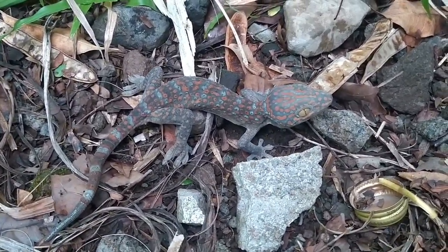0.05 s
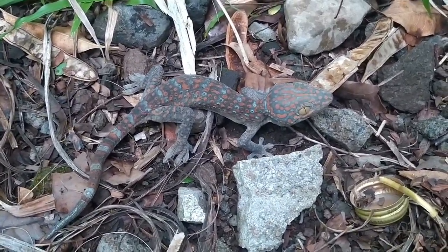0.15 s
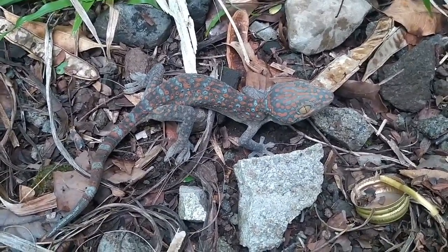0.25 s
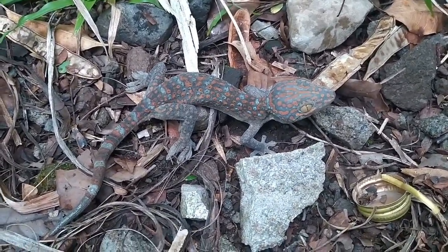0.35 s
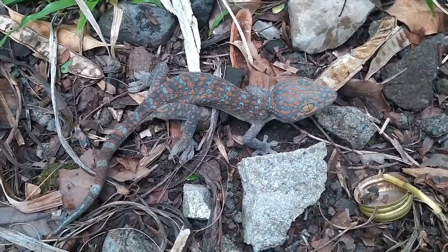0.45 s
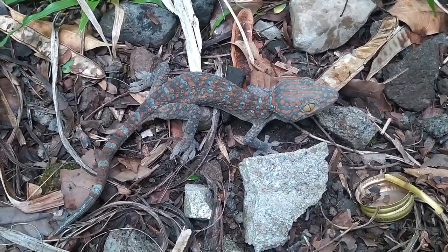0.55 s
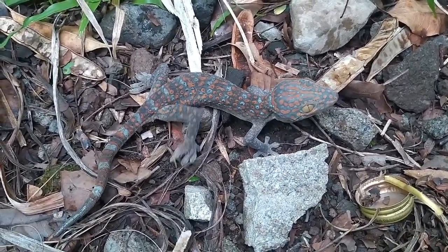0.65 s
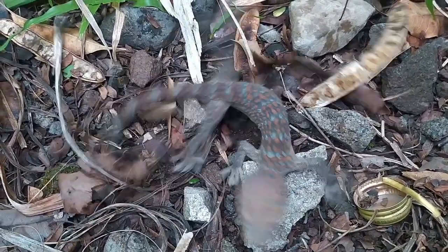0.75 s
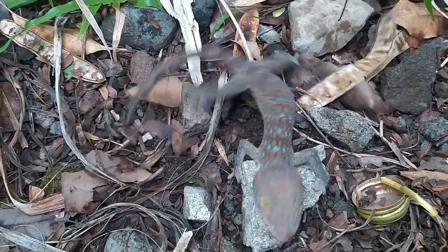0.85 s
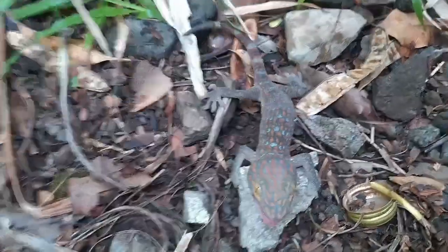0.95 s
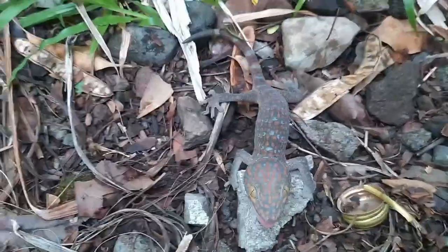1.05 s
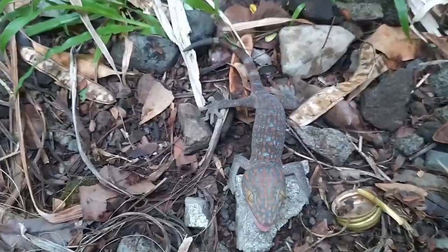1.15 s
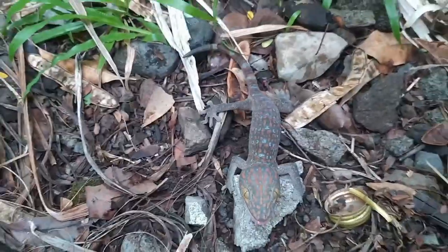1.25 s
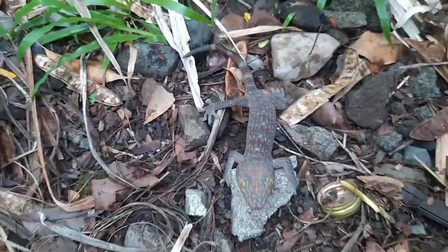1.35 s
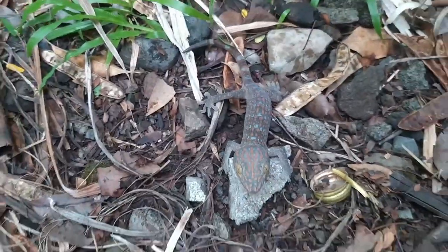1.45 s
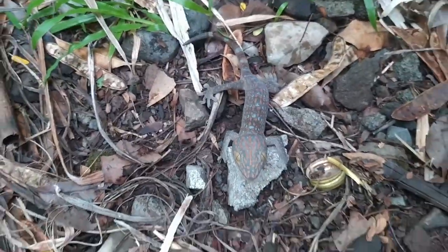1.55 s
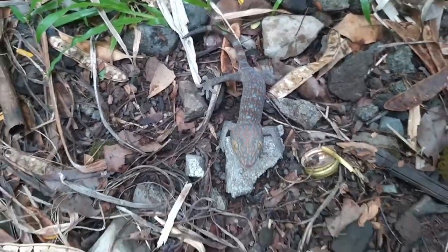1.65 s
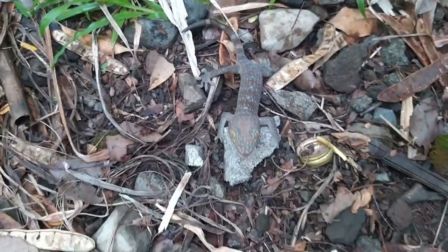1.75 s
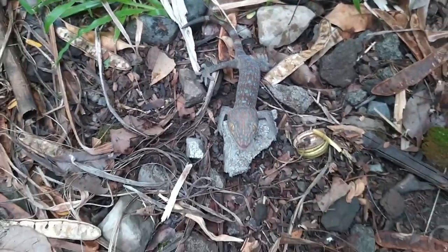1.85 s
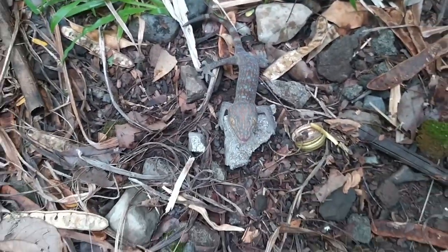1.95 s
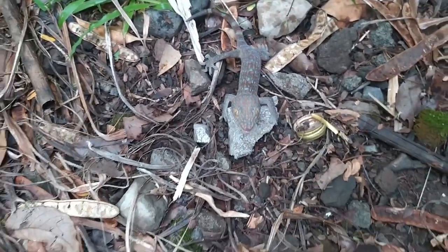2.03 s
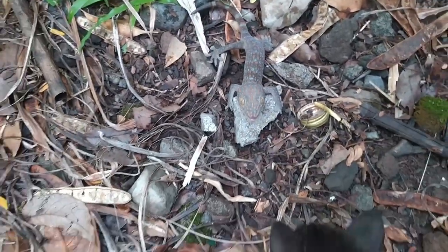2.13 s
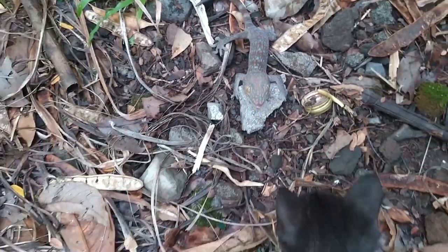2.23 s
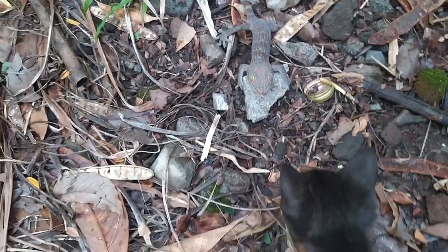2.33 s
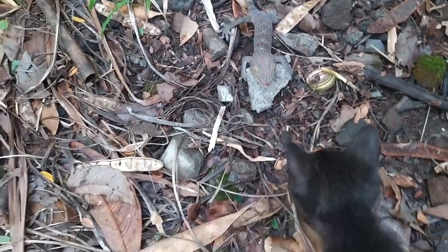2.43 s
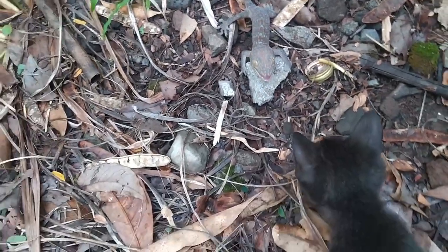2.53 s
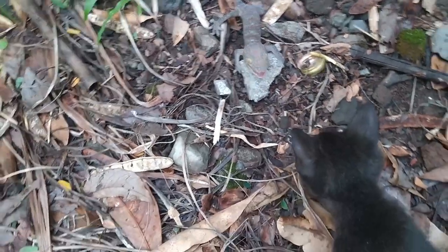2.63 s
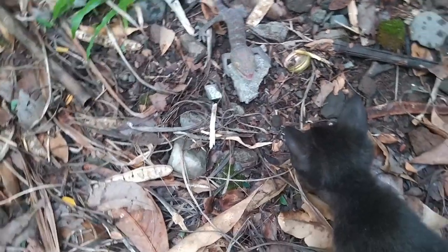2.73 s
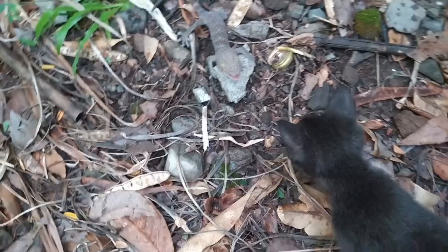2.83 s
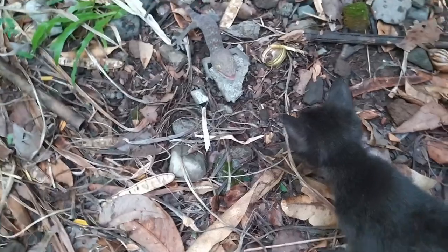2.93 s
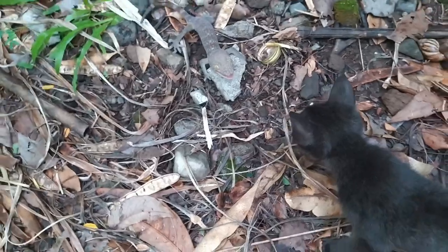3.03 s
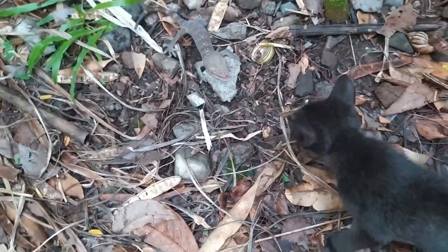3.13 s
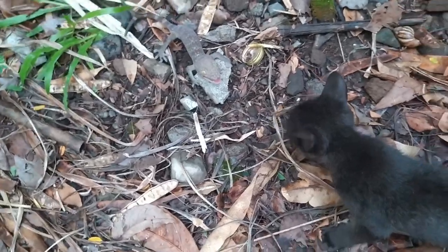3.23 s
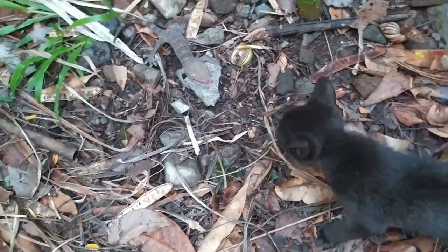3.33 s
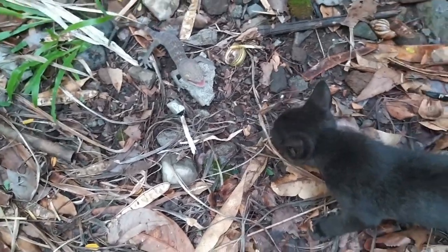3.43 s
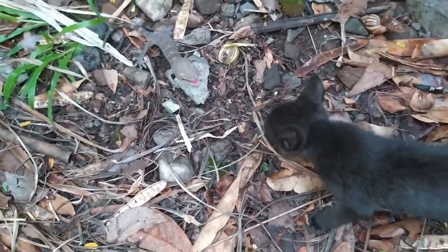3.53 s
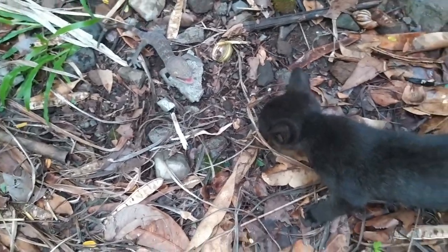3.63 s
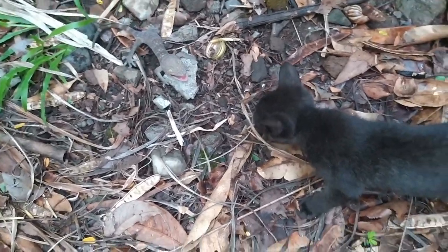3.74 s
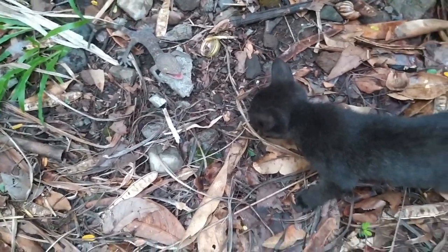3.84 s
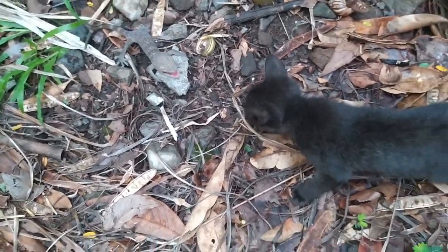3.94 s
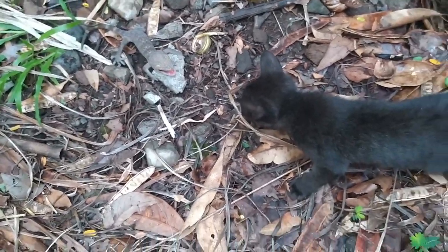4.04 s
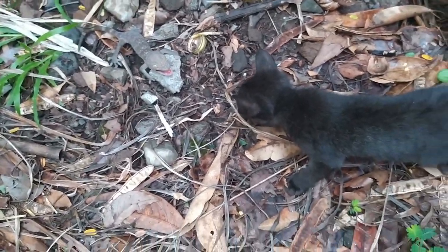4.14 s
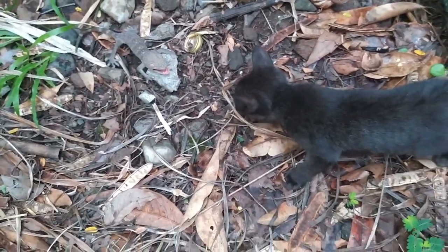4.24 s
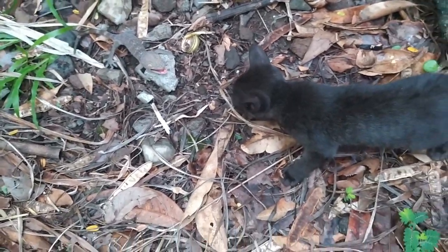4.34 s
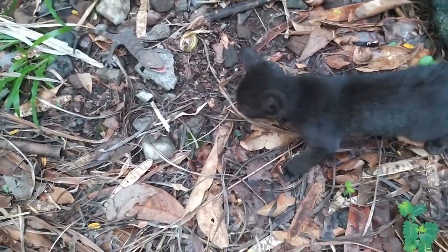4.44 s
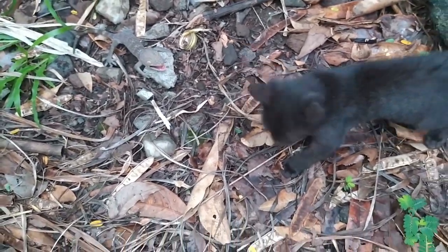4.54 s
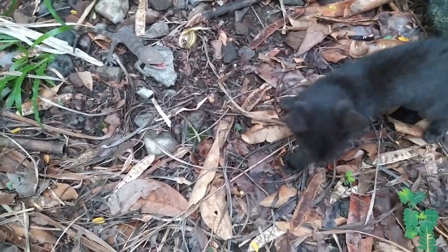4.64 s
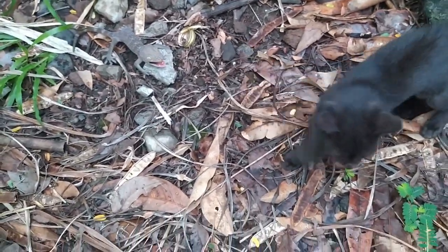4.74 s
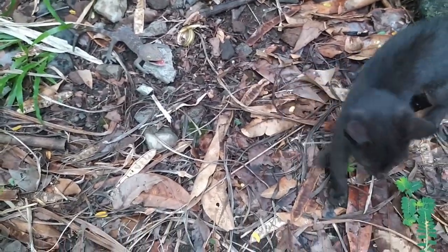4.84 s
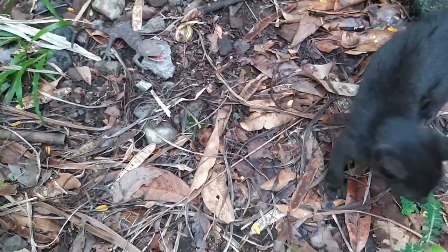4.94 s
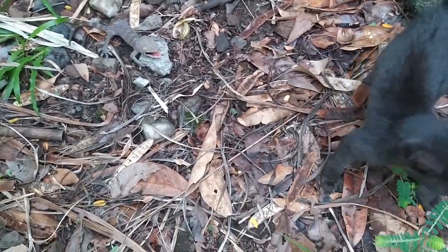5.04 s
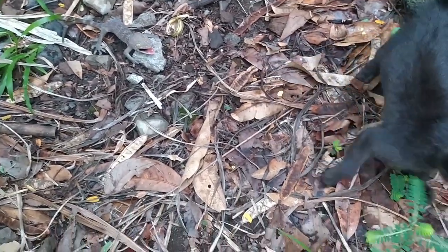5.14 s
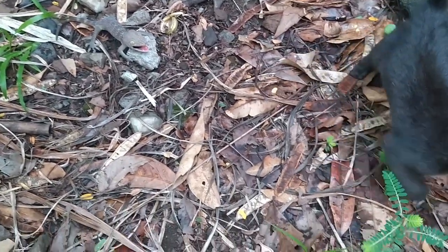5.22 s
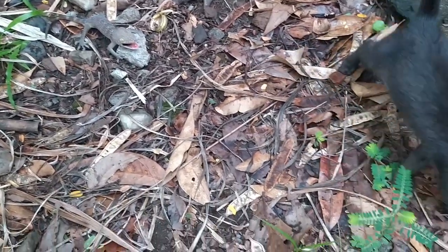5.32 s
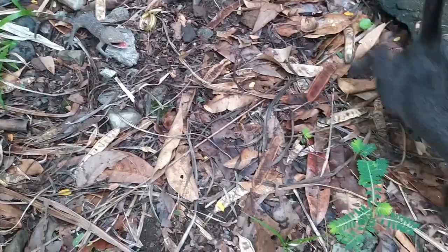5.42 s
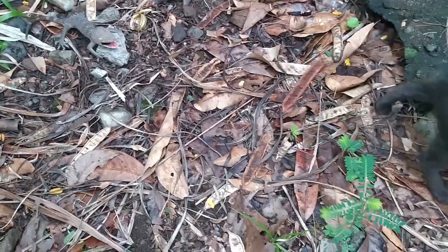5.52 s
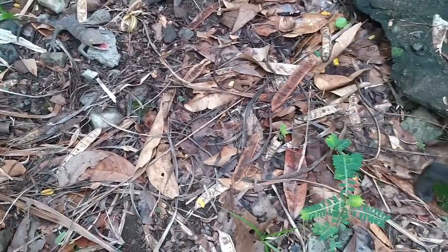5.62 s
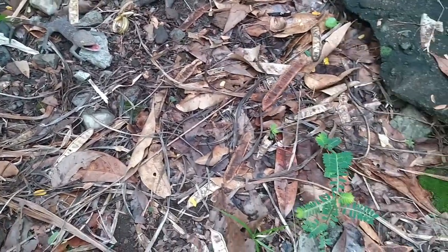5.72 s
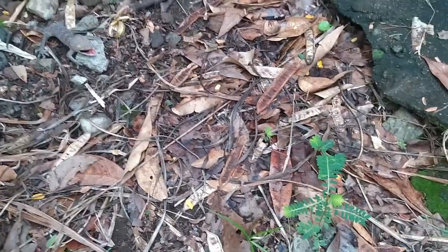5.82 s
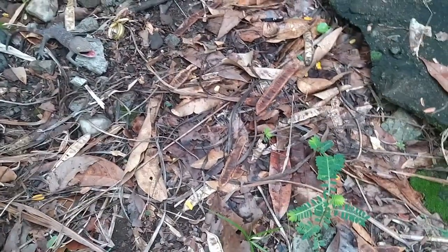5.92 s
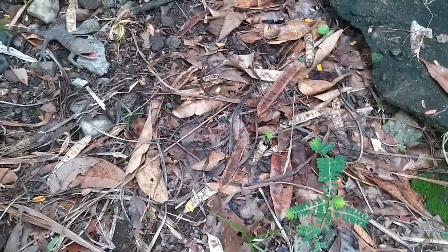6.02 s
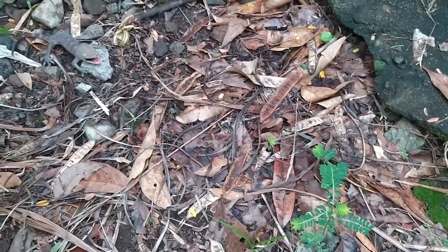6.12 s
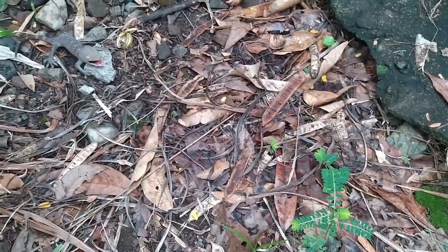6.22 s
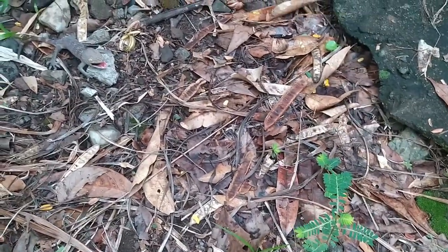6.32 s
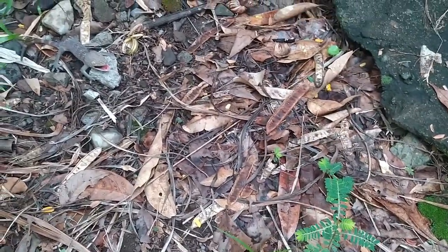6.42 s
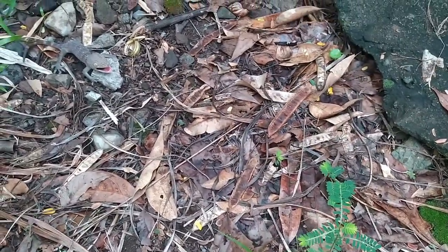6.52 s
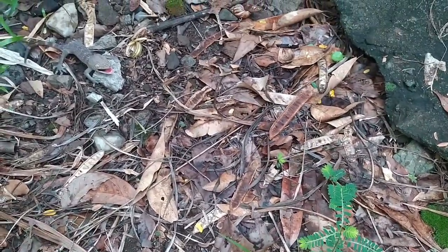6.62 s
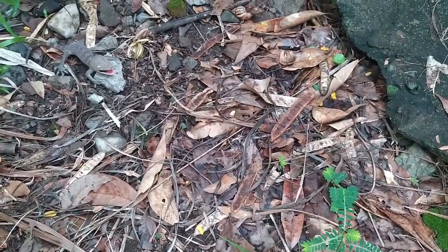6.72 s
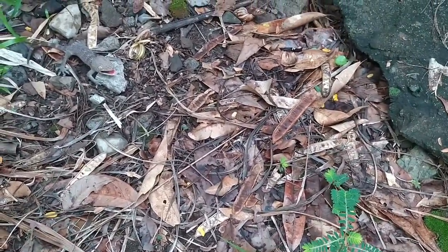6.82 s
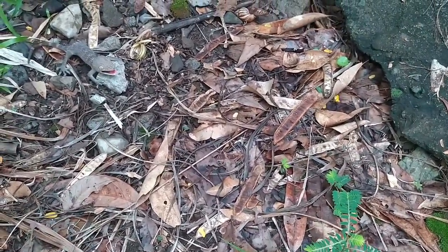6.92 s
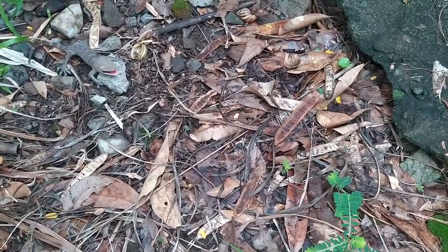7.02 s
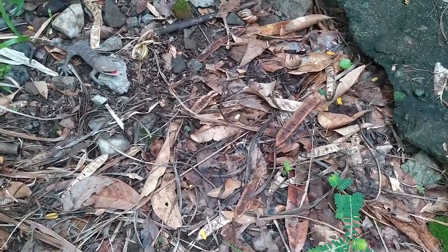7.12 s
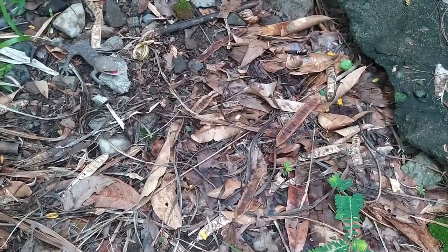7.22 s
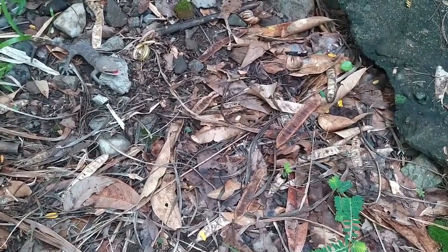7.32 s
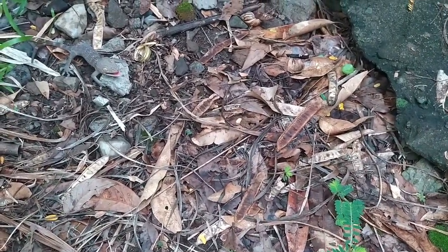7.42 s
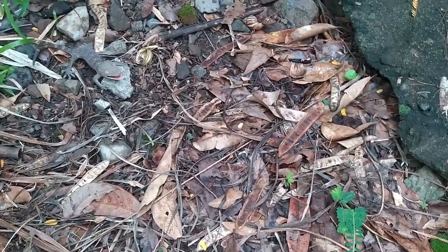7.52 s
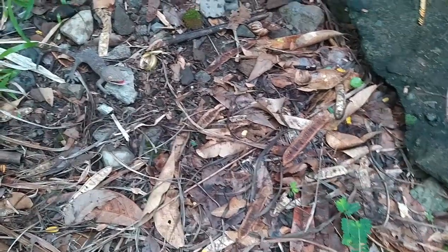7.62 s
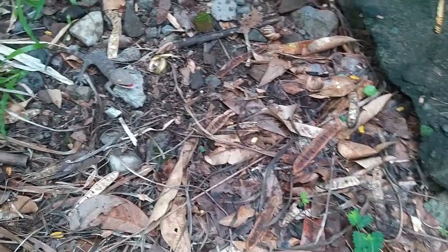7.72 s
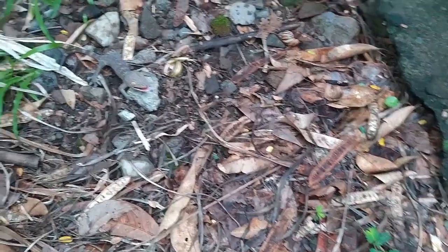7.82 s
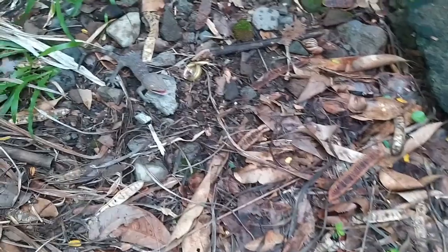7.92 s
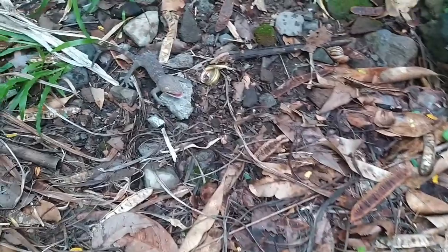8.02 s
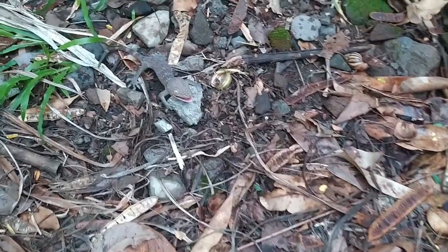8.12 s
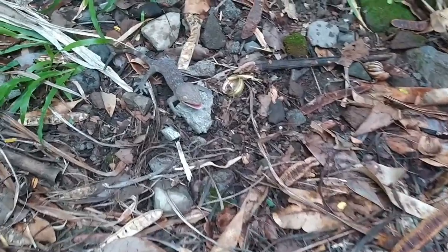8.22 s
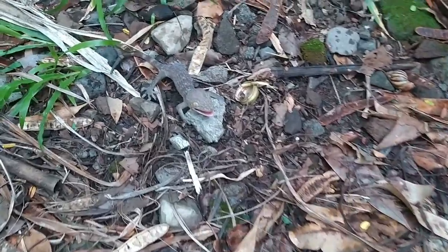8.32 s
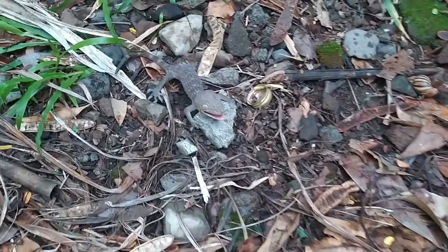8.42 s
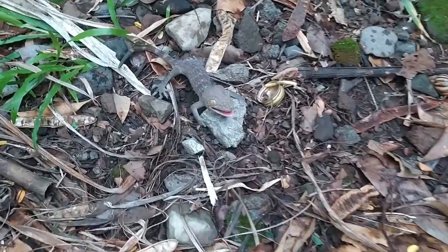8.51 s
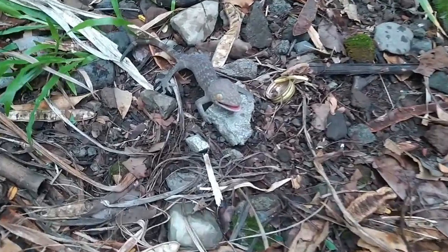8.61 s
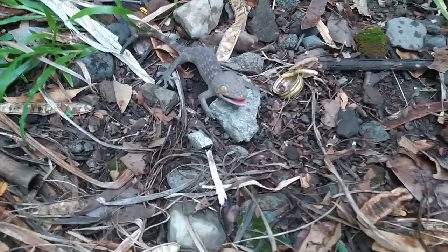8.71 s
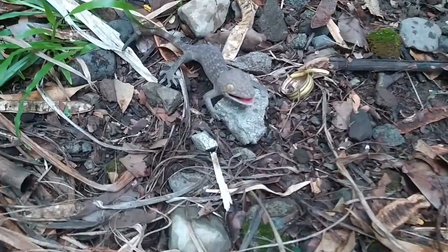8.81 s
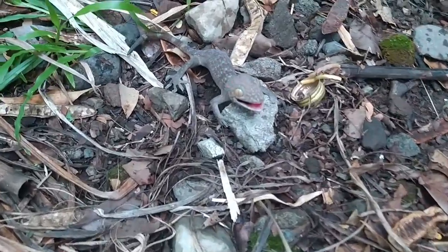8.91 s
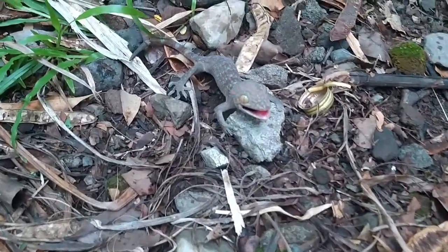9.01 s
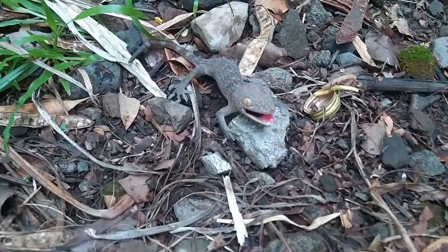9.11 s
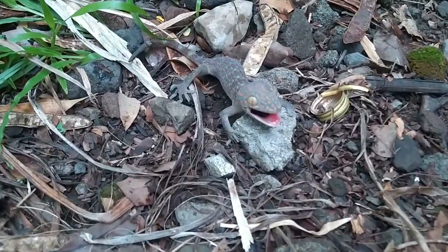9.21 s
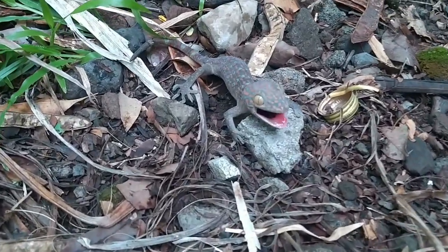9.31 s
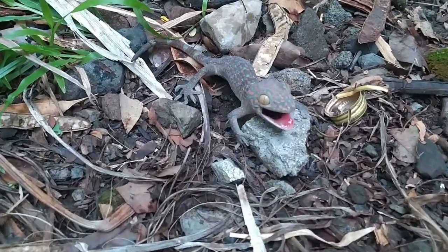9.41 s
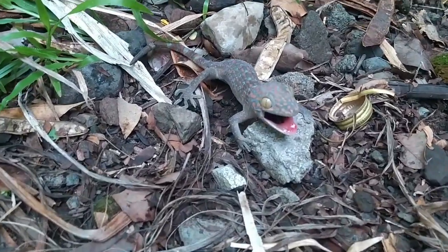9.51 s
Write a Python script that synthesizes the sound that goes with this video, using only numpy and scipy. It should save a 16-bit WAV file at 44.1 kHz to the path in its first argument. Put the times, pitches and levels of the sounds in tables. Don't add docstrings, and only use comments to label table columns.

```python
import sys
import numpy as np
from scipy import signal
from scipy.io import wavfile
from scipy.ndimage import uniform_filter1d

SR = 44100
rng = np.random.default_rng(int(sys.argv[2]) if len(sys.argv) > 2 else 0)


def to_wav(s):
    ch = np.atleast_2d(s).T
    pcm = np.round(np.clip(ch, -1, 1) * 32767)
    wavfile.write(sys.argv[1], SR, pcm.astype(np.int16))


def invert_db(level):
    return 10 ** (np.asarray(level, dtype=float) / 20)


N = 421596
T = np.arange(N) / SR


def rms_one(x):
    return x / np.sqrt(np.mean(x ** 2) + 1e-20)


def at_hz(points, hz):
    point_hz, value = np.array(points).T
    return np.interp(np.log(hz), np.log(np.maximum(point_hz, 1)), value)


def drift(rate_hz):
    r = np.exp(-80 * np.pi * rate_hz / SR)
    noise = rng.standard_normal(N // 40 + 2002)
    slow = signal.lfilter([1], [1, -2 * r, r * r], noise)[2000:]
    return np.interp(np.arange(N) / 40, np.arange(len(slow)), rms_one(slow))


def resonate(x, modes):
    out = 0
    for hz, width_hz, db in modes:
        r, w = np.exp(-np.pi * width_hz / SR), 2 * np.pi * hz / SR
        ring = signal.lfilter([.5, 0, -.5], [1, -2 * r * np.cos(w), r * r], x + 1e-18)
        out = out + invert_db(db) * ring
    return out


def pan(left_right_db):
    return invert_db(np.array([[left_right_db / 2], [-left_right_db / 2]]))


def add(out, start_s, sound):
    i = round(start_s * SR)
    out[:, i:i + sound.shape[1]] += sound[:, :N - i]


def swell(peak_s, db, rise_s, fade_s):
    return invert_db(db - 10 * np.maximum((peak_s - T) / rise_s, (T - peak_s) / fade_s))


def power_sum(gains):
    return np.sqrt(sum(g ** 2 for g in gains))


def tone(hz):
    return np.sqrt(2) * np.sin(2 * np.pi * np.cumsum(hz) / SR)


def glide(length_s, start_hz, end_hz, octave_db=-60):
    hz = np.linspace(start_hz, end_hz, round(length_s * SR))
    return np.hanning(len(hz))[None] ** 0.13 * (tone(hz) + invert_db(octave_db) * tone(2 * hz))


# freq_hz, left_right_correlation
LIKENESS = [(60, 0.27), (180, 0.4), (550, 0.51), (1650, -0.02), (4970, 0.076), (15000, 0.02)]
# freq_hz, left_right_db
TILT = [(60, -1.5), (150, 0.5), (380, -2), (950, 3), (2380, 4.5), (5980, 1), (15000, 7.5)]


def bands(pair, spectrum, low_hz, patchy_db):
    out, together = 0, drift(1.2)
    edges_hz = low_hz * 2 ** np.arange(0, np.log2(17000 / low_hz), .45)
    for k, (low, high) in enumerate(zip(edges_hz, edges_hz[1:])):
        band = signal.butter(2, [low, high], "band", fs=SR, output="sos")
        mid, side = signal.sosfilt(band, pair[k % 2])
        hz = np.sqrt(low * high)
        alike = np.clip(at_hz(LIKENESS, hz), -1, 1)
        gain = invert_db(at_hz(spectrum, hz) + patchy_db * (0.38 * together + drift(2.7)))
        stereo = np.sqrt(1 + alike) * mid + np.sqrt(1 - alike) * side * [[1], [-1]]
        out = out + gain * pan(at_hz(TILT, hz)) * stereo
    return rms_one(out)


# freq_hz, density_db_per_hz
AIR = [(20, 0.5), (32, -4.5), (62, 1), (96, -7), (200, -8.5), (465, -17), (1100, -18), (2400, -20.5),
       (4300, -25), (6300, -22.5), (8500, -25), (10500, -18), (12500, -25), (16000, -20)]


def air():
    return invert_db(-59) * bands(rng.standard_normal((2, 2, N)), AIR, low_hz=23.5, patchy_db=.6)


# start_s, peak_db,
# pitch_hz, left_right_db
BUMPS = [(0.488, -49.5, 215, 5), (2.809, -43.5, 177, 18), (2.846, -50.5, 197, 26), (2.871, -49, 189, 22),
         (2.893, -48.5, 180, 21.5), (2.929, -63, 215, 5), (1.214, -47, 170, 14), (3.504, -47, 377, 0),
         (3.78, -53, 860, -8), (8.718, -62, 240, 15.5), (8.944, -49.5, 166.7, 22.5)]


def bumps():
    out = np.zeros((2, N))
    click = np.pad(np.hanning(24), (0, 6000))[None] / 11
    for start_s, db, hz, pan_db in BUMPS:
        case = [(hz, 30, 0), (hz * 1.42, 60, -3), (hz * 4.3, 400, -4), (2200, 1800, 0)]
        add(out, start_s, invert_db(db - 5) * pan(pan_db) * resonate(click, case))
    return out


# peak_s, level_db
BUZZ = [
    (.072, -65),
    (.134, -61),
    (2.704, -57),
    (2.977, -61.5),
    (3.144, -63.5),
    (3.268, -64),
    (7.028, -62),
    (7.244, -62),
    (7.603, -60),
]


def insect():
    wing = [(4980, 460, 0)]
    pulses = rng.standard_normal((2, N)) * (1 + 0.23 * np.sin(2 * np.pi * 55 * T))
    buzz = rms_one(resonate(resonate(pulses, wing), wing))
    return buzz * power_sum(swell(s, db - 4, rise_s=.035, fade_s=.074) for s, db in BUZZ)


def trees(x, wet_db):
    t60_s, t = 0.7, T[:SR]
    tail = rng.standard_normal((2, SR)) * invert_db(-60 * t / t60_s)
    tail = tail * invert_db(rng.standard_normal((2, SR)))
    tail = tail / np.sqrt(np.sum(tail ** 2, axis=1, keepdims=True))
    return x + invert_db(wet_db) * signal.fftconvolve(x[None], tail, axes=1)[:, :N]


# start_s, length_s, pitch_hz, level_db, octave_db
FOWL = [(3.055, 0.065, 1225, -70, -34), (7.85, 0.24, 1550, -78.5, -22), (8.237, 0.078, 646, -75.5, -16),
        (8.326, 0.056, 558, -64, -10), (8.476, 0.11, 555.6, -62.5, -17), (8.641, .06, 560, -77, -14.5),
        (8.784, 0.079, 544, -69, -9), (9.134, 0.14, 947, -69.5, 2), (9.36, 0.27, 949, -67, -2),
        (3.9, 0.46, 993, -77.5, -24), (4.301, 0.46, 900, -74, -14), (4.85, 0.35, 830, -77, -22),
        (8.2, 0.96, 1483, -81.5, -30.5)]


def fowl():
    out = np.zeros((1, N))
    for start_s, length_s, hz, db, octave_db in FOWL:
        add(out, start_s, invert_db(db - 6) * glide(length_s, hz * 1.002, hz * .998, octave_db))
    return out[0] * invert_db(4 * drift(20) - 1)


# start_s, length_s, pitch_hz, level_db
LEAD = [
    (6.605, 0.078, 2390, -61),
    (6.658, 0.046, 2380, -60),
]


def lead_in():
    out = np.zeros((1, N))
    for start_s, length_s, hz, db in LEAD:
        fade = np.hanning(round(length_s * SR)) ** 0.53
        add(out, start_s, invert_db(db) * fade * glide(length_s, hz, hz))
    return out


# time_s, pitch_hz, level_db
FALL = [
    (6.7, 3000, -73),
    (6.718, 2650, -59),
    (6.75, 2294, -48.5),
    (6.8, 2044, -55),
    (6.9, 1557, -57.5),
    (7.0, 1288, -67.5),
    (7.1, 1127, -72),
    (7.22, 1040, -85),
    (7.3, 1020, -120),
]


def falling_call():
    echo_s, echo_db = 0.063, -2.5
    time_s, hz, db = np.transpose(FALL)
    level = (T > time_s[0]) * invert_db(np.interp(T, time_s, db) - 3.5 + 2.2 * drift(60))
    slide = level * tone(uniform_filter1d(np.interp(T, time_s, hz), size=900))
    return slide + invert_db(echo_db) * np.roll(slide, round(echo_s * SR))


# peak_s, level_db
SYLLABLES = [
    (3.575, -55),
    (3.607, -47),
    (3.716, -46.5),
    (3.86, -45.5),
    (3.951, -46),
    (4.073, -51),
    (4.275, -55),
]
# start_s, length_s, start_hz, end_hz, level_db
NOTES = [
    (3.604, 0.019, 2560, 2220, -49.5),
    (3.684, 0.031, 2960, 2644, -53),
    (3.711, 0.01, 2560, 2410, -47),
    (3.823, 0.032, 2827, 2520, -51),
    (3.851, 0.012, 2710, 2470, -41),
    (3.938, 0.015, 2570, 2194, -43.5),
    (4.035, 0.025, 2760, 2540, -52),
    (4.059, 0.01, 2475, 2290, -47),
    (4.268, 0.0074, 2490, 2170, -49),
]


def warbler():
    level = power_sum(swell(s, db, rise_s=.043, fade_s=.024) for s, db in SYLLABLES)
    level = level * (T > SYLLABLES[0][0] - .01)
    shake = np.sin(2 * np.pi * np.cumsum(110 + 30 * drift(40)) / SR)
    shake_hz = np.interp(T, [3.6, 4.1], [420, 300])
    hoarse = invert_db(-5.5 + 3.8 * drift(95))
    pitch_hz = 2513 + shake_hz * shake + 110 * drift(116.8)
    voice = level * hoarse * tone(pitch_hz)
    throat = signal.butter(2, [1950, 3250], "band", fs=SR, output="sos")
    voice = signal.sosfilt(throat, voice)
    notes = np.zeros((1, N))
    for start_s, length_s, start_hz, end_hz, db in NOTES:
        add(notes, start_s, invert_db(db) * glide(length_s, start_hz, end_hz))
    return voice + notes[0]


# freq_hz, density_db_per_hz
LEAF = [(700, -25), (1300, -14), (2200, -5.5), (3400, -14), (5000, -13), (6300, -11), (7800, 0),
        (9300, -1.5), (10800, -3.5), (12500, -5), (15500, -11), (17000, -20)]
# peak_s, rustle_db, fade_s_per_10db, heavy_leaf_db
STIRS = [(.78, -54, 0.06, -10.5), (.828, -50.5, 0.1, -9), (.92, -40, 0.17, -24), (.996, -32, 0.043, -17),
         (1.035, -44.5, 0.07, -12.5), (1.15, -46, 0.0462, -6.5), (1.26, -62.5, 0.4, -7.5),
         (2.159, -60.5, 0.5, -18.5), (3.15, -57.5, 0.24, -12), (3.514, -59.5, 0.2, -7),
         (3.72, -60, 0.3, -12), (3.955, -59.5, 0.4, -10), (4.376, -54.5, 0.1, -13), (4.545, -45, 0.17, -13),
         (4.59, -50, 0.04, -21), (4.884, -62, 0.2, -7), (5.1, -53, 0.18, -14.5), (5.234, -59.5, 0.1, -21),
         (5.35, -52.5, 0.2, -16), (5.43, -51, 0.3, -25), (5.584, -49, 0.13, -14), (5.69, -56.5, 0.23, -10),
         (5.785, -51.5, 0.24, -23), (5.921, -51, 0.02, -12), (6.102, -50.5, 0.04, -16),
         (6.316, -55, 0, -22), (6.802, -58.5, 0.7, -12), (7.13, -54, .2, -12), (7.58, -61.5, 0.06, -7.5),
         (7.864, -56.5, .5, -14), (8.389, -56, 0.02, -6)]


def rustle():
    stirs = []
    for peak_s, db, fade_s, heavy_db in STIRS:
        stirs.append((swell(peak_s, db, .025, fade_s), invert_db(heavy_db)))
    stirs.append((invert_db(-67), invert_db(-9)))
    born = rng.random((2, 2, N)) < 3000 * invert_db(3 * drift(40)) / SR
    size = invert_db(2 * np.minimum(rng.exponential(1, (2, 2, N)), 5))
    grains = born * size * rng.choice([-1, 1], (2, 2, N))
    leaves = bands(grains, LEAF, low_hz=900, patchy_db=2.5)
    heavy_leaves = signal.sosfilt(signal.butter(4, 5800, "low", fs=SR, output="sos"), leaves)
    thin_leaves = signal.sosfilt(signal.butter(4, 5800, "high", fs=SR, output="sos"), leaves)
    thin_gain = power_sum(gain for gain, heavy in stirs)
    heavy_gain = invert_db(12) * power_sum(gain * heavy for gain, heavy in stirs)
    return thin_gain * thin_leaves + heavy_gain * heavy_leaves


# freq_hz, width_hz, level_db
PORTS = [
    [(8100, 3400, -3.5), (9400, 4200, -7.5), (13500, 2000, -6)],
    [(9050, 930, -3.5), (7400, 1500, -7), (13550, 2300, -8)],
]


def through_ports(x):
    return np.array([resonate(c, modes) for c, modes in zip(x, PORTS)])


# start_s, peak_db, left_right_db, lowest_ring_hz
TICKS = [(0.389, -39, 13, 4030), (.7615, -39, 8, 5500), (.7755, -33.5, 0, 6600), (.8245, -41, 0, 5000),
         (.831, -38, 2, 5000), (.844, -40, 3, 7000), (.8645, -42, 2, 5500), (.884, -34, 4, 5000),
         (0.913, -36, 2, 7000), (.9185, -34.5, 4, 3200), (.9205, -31.5, 2, 7000), (.930, -33, 1.5, 7500),
         (1.1154, -43, -10, 4000), (1.824, -43.5, 0, 4010), (4.364, -32.5, 8, 3990), (4.4934, -41, 3, 4500),
         (5.012, -32, 9, 3500), (5.062, -40, 6, 6000), (5.201, -43, 5, 5500), (5.3614, -50, 1, 5960),
         (5.5736, -31.5, 5, 4460), (5.584, -43, 0, 5000), (5.5886, -24, 8, 6200), (5.596, -41, 4, 6000),
         (5.662, -33.5, 5, 6600), (5.7653, -33, 11, 5960), (5.7666, -26.5, 9, 5540), (5.7695, -32, 0, 4440),
         (5.772, -33, 4, 6000), (5.806, -35, 10, 6030), (5.8954, -45, 4, 6500), (5.917, -40, 5, 6100),
         (5.922, -41, 7, 6000), (5.968, -36, 10, 6550), (6.054, -39, 2, 5040), (6.094, -42, 1, 6000),
         (6.2975, -45, 1, 5980), (7.8684, -41, 5, 5990), (8.198, -50, -5, 6000), (8.248, -44, 4, 6000),
         (8.362, -50, 3, 8000), (8.372, -38, 6, 7500), (8.401, -33.5, 5, 5000), (8.465, -32, 8, 7650),
         (8.5098, -39, 11, 8100), (8.538, -35.5, 7, 8600), (8.5638, -29, 6, 4250), (8.579, -42, 4, 4430)]


def ticks():
    out, t = np.zeros((2, N)), T[:800]
    envelope = np.minimum(t / 0.00044, 1) * invert_db(-60 * t / .006)
    chance = rng.standard_normal((len(TICKS), 2, 800))
    for (start_s, db, pan_db, low_hz), spray in zip(TICKS, chance):
        burst = 0.3 * (spray[0] + 0.46 * spray) * envelope
        burst[:, 14] += .7
        leaf = resonate(burst, [(low_hz * 1.15, 2000, 0), (14500, 3000, 0)])
        ring = through_ports(burst) + invert_db(-8.5) * leaf
        thin = signal.butter(4, low_hz, "high", fs=SR, output="sos")
        add(out, start_s - .0003, invert_db(db) * pan(pan_db) * signal.sosfilt(thin, ring))
    return out


# start_s, peak_db, body_hz, body_share_db, left_right_db
CRACKS = [(0.2409, -51.5, 1660, -5.5, 11), (0.7492, -46, 2280, -6, 2), (0.9092, -27.5, 3310, -14, -1),
          (0.948, -41, 4100, -8, 0.5), (1.1418, -36, 1580, -7, 1), (1.1752, -33.5, 2980, -9, -9),
          (1.1954, -42.5, 1960, 9.5, -1), (1.2141, -43, 2380, 4.5, 3), (1.273, -46, 1310, -6, -4),
          (1.6821, -33, 1360, -17, 1.5), (2.0607, -48.5, 1850, -12, 13.5), (3.1403, -26, 2180, -6.5, 6),
          (3.5024, -31, 2060, 1.5, 3), (3.7444, -53.5, 2500, 6.5, -5), (4.5072, -34, 4420, -14, 5),
          (4.5341, -47, 3700, 2, 0), (4.8803, -42, 2260, -1.5, 3), (5.0938, -35, 1750, -13.5, -2),
          (5.693, -30.5, 1266, -16, 1.5), (8.3497, -47, 4500, -4.5, 0.5), (9.0444, -52.5, 1920, -2, 8),
          (9.0828, -46.5, 3020, -6, 2), (9.3392, -48, 891, -7.5, 12)]


def cracks():
    out, t = np.zeros((2, N)), T[:2000]
    envelope = np.minimum(t / .0006, 1) * invert_db(-60 * t / .033)
    chance = rng.standard_normal((len(CRACKS), 2, 2000))
    for (start_s, db, body_hz, body_db, pan_db), spray in zip(CRACKS, chance):
        burst = .08 * spray ** 3 * envelope
        burst[:, 30] = .65
        body = [(body_hz, 1000, 0), (body_hz * 0.38, 500, -9), (min(body_hz * 1.82, 6000), 2500, -3)]
        crack = through_ports(burst) + invert_db(body_db) * resonate(burst, body)
        add(out, start_s - .0003, invert_db(db) * pan(pan_db) * crack)
    return out


# freq_hz, width_hz, level_db
POD = [(805, 200, -14.5), (1180, 310, 0.5), (1495, 140, -6), (2144, 320, -3), (3000, 1700, -16.5),
       (3980, 700, 3.5), (300, 290, -21.5)]


def hollow(x):
    bass_lag, treble_lag = 7, 15
    body = signal.butter(2, [600, 4800], "band", fs=SR, output="sos")
    x = signal.sosfilt(body, resonate(x, POD))
    bass = signal.sosfiltfilt(signal.butter(2, 1900, fs=SR, output="sos"), x)
    return np.array([np.roll(bass, bass_lag) + np.roll(x - bass, treble_lag), x])


# start_s, peak_db, hollow_share_db, left_right_db
TEAR = [
    (.9777, -7, -9, -2),
    (.9793, -7, -9, 1),
    (.9810, -4, -9, -1),
    (.9834, -5, -9, 1),
    (.9858, -5, -10, -1),
    (.9884, -4, -11, -1),
    (.9916, -4, -14, 3),
]
# freq_hz, width_hz, level_db
TEAR_PORTS = [
    [(8180, 790, -2), (9650, 2700, -2), (11900, 5000, 3)],
    [(9430, 1100, 2.5), (7500, 980, -4.5)],
]
# start_s, peak_db, length_s
RATTLE = [
    (.9945, -23, .006),
    (.9995, -26, .005),
    (1.0035, -28, .006),
    (1.0090, -36, .009),
    (1.0180, -30, .008),
    (1.0290, -28, .007),
    (1.036, -43, .02),
]


def tear():
    out, t = np.zeros((2, N)), T[:3000]
    thin = signal.butter(4, 6300, "high", fs=SR, output="sos")
    dull = signal.butter(2, 1900, fs=SR, output="sos")
    chance = rng.standard_normal((len(TEAR), 2, 3000))
    for (start_s, db, hollow_db, pan_db), noise in zip(TEAR, chance):
        scratch = 0.45 * noise * invert_db(-60 * t / 0.0028)
        scratch[:, 0] = 1
        ports = [resonate(resonate(c, modes), modes) for c, modes in zip(scratch, TEAR_PORTS)]
        add(out, start_s, invert_db(db - 16.5) * pan(pan_db) * signal.sosfilt(thin, ports))
        add(out, start_s, invert_db(db + hollow_db) * pan(2.5) * hollow(scratch[0]))
    chance = rng.standard_normal((len(RATTLE), 3000))
    for (start_s, db, length_s), noise in zip(RATTLE, chance):
        envelope = np.sin(np.pi * np.clip(t / length_s, 0, 1))
        knock = signal.sosfilt(dull, noise * envelope)
        add(out, start_s, invert_db(db - 19) * pan(1.5) * hollow(knock))
    return out


def scene():
    background = air()
    far = trees(warbler(), wet_db=-1) * pan(7.5)
    far = far + (trees(falling_call(), wet_db=5) + lead_in()) * pan(6.9)
    far = far + trees(fowl(), wet_db=5) * pan(4.9)
    near = rustle() + cracks() + tear() + bumps() + insect() + ticks()
    return background + far + near


def hush(x):
    hz, _, z = signal.stft(x, SR, nperseg=1024, noverlap=512)
    size = np.abs(z).mean(axis=0)
    level = uniform_filter1d(uniform_filter1d(size, size=3, axis=1), size=3, axis=0)
    loudness = size.mean(axis=0)
    quiet = loudness < 4 * np.median(loudness)
    sunk = level < .92 * uniform_filter1d(level, size=13, axis=0)
    weak = sunk & (hz[:, None] > 3300) & quiet
    return signal.istft(z * np.where(weak, invert_db(-20), 1.), SR, nperseg=1024, noverlap=512)[1][:, :N]


def roll_off(x):
    return signal.sosfilt(signal.butter(12, 16630, fs=SR, output="sos"), x)


def record(dry):
    shelf_hz, shelf_db, cutoff_hz = 10750, -11, 16700
    below = signal.sosfiltfilt(signal.butter(8, shelf_hz, fs=SR, output="sos"), dry)
    shelved = below + invert_db(shelf_db) * (dry - below)
    rounded = 0.84 * np.tanh(shelved / 0.76)
    top_cut = signal.cheby2(12, 70, cutoff_hz, fs=SR, output="sos")
    mix = signal.sosfilt(top_cut, hush(rounded))
    return roll_off(mix)


dry = scene()
out = record(dry)
to_wav(out)
```